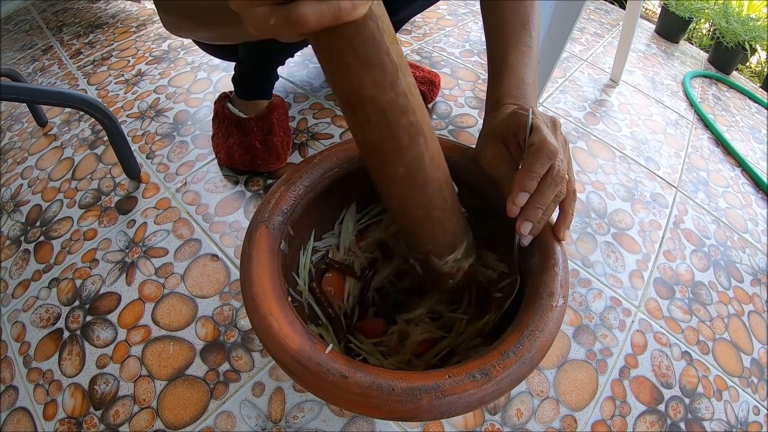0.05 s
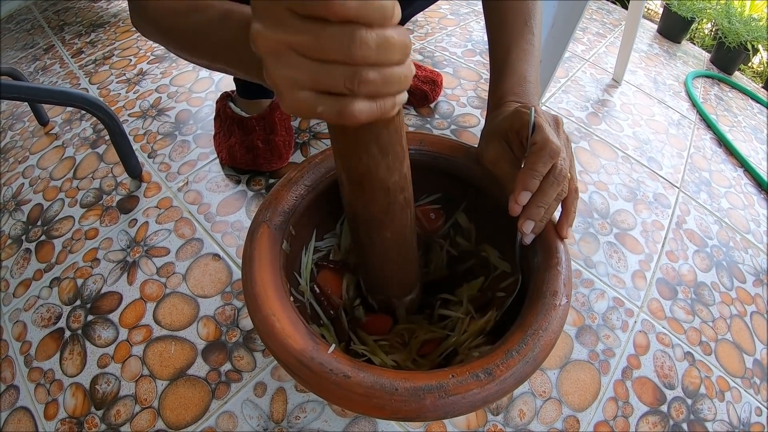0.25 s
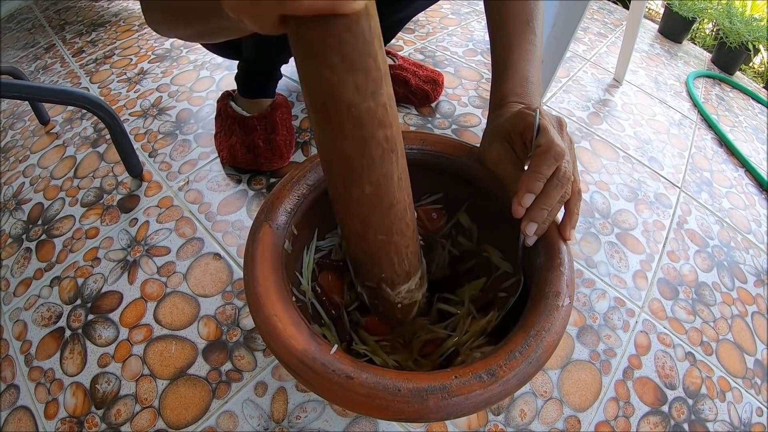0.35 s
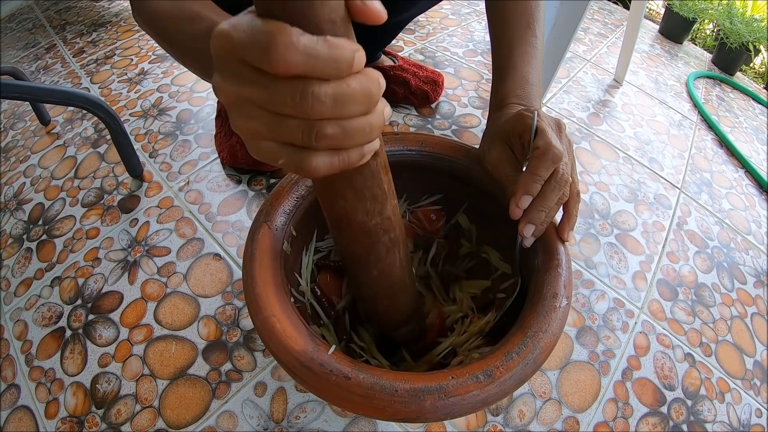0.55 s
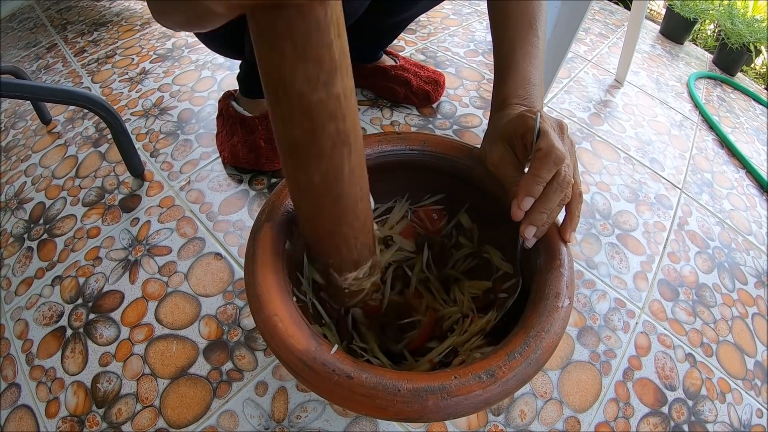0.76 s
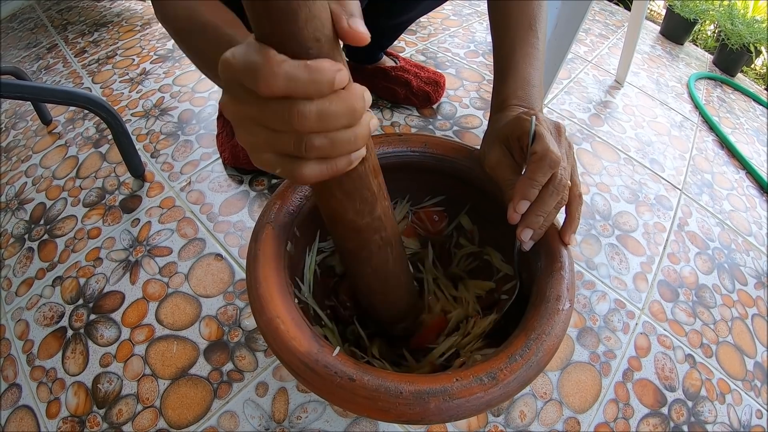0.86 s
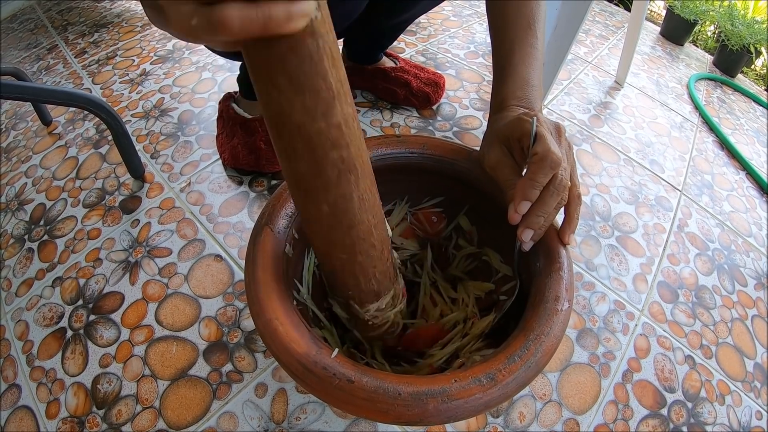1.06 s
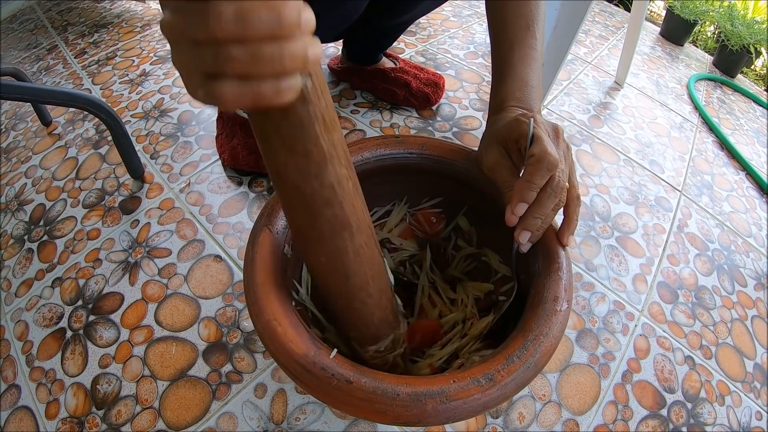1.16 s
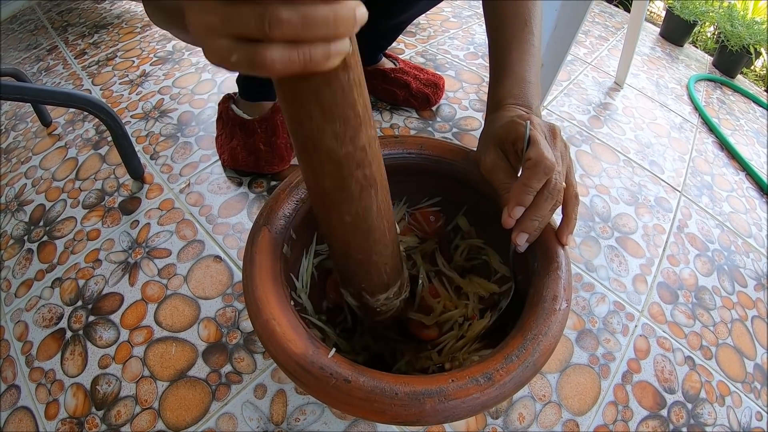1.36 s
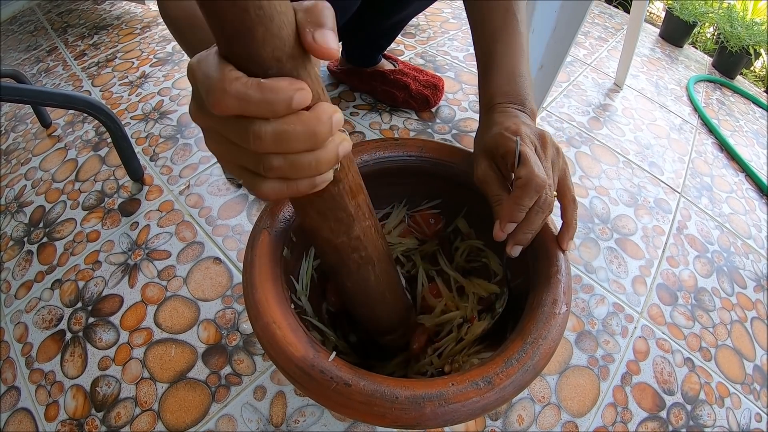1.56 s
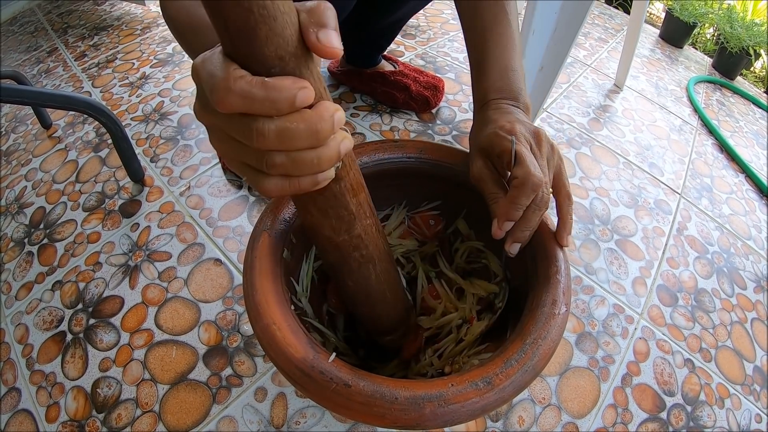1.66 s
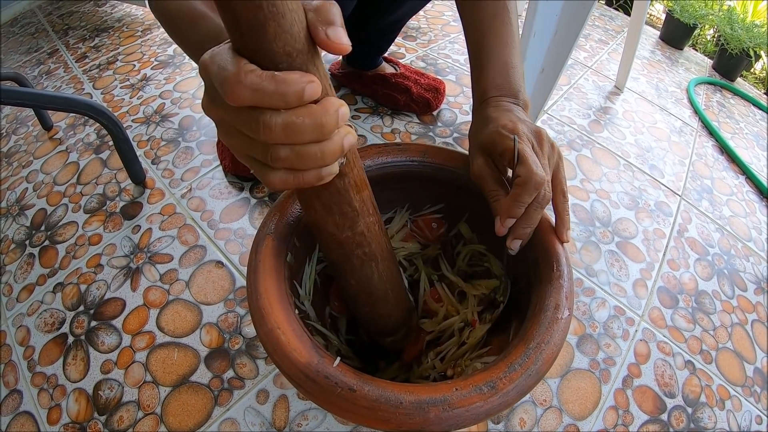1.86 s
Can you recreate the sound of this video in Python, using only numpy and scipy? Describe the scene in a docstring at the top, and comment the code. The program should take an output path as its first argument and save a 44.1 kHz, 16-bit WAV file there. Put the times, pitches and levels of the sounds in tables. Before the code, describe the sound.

Close by, five steady strokes of a wooden pestle crush wet stalks in a clay mortar, each with a crunch, a squelch and a faint suck. The pot knocks and rings dully, loudest on the first and third strokes.

```python
"""Five wet, crunchy strokes of a wooden pestle pounding herbs and tomato in a clay mortar, close up.
Each stroke crunches through the stalks, squeezes out a squelch of tiny bubbles and lets go with a faint
suck. The pot knocks dully on the tiled floor and rings, with one clack of wood on bare clay and a few
light clinks. A low rumble lies under it all."""
import sys
import numpy as np
from scipy import signal
from scipy.fft import rfft, irfft
from scipy.io import wavfile

SR = 44100
rng = np.random.default_rng(int(sys.argv[2]) if len(sys.argv) > 2 else 0)


def int16_out(signal):
    """Quantize to a 16-bit WAV file."""
    q = np.round(np.clip(np.atleast_2d(signal).T, -1, 1) * 32767)
    wavfile.write(sys.argv[1], SR, q.astype(np.int16))


N = 83790
TIME = np.arange(N) / SR
LN_1000 = np.log(1000)  # 60 dB of decay


def from_db(db):
    """Decibels to gain."""
    return 10 ** (np.asarray(db) / 20)


def rms_one(x):
    """Scale to unit power."""
    return x / np.sqrt(np.mean(x ** 2) + 1e-20)


def at_hz(points, hz):
    """Read an EQ curve on a log-frequency axis."""
    freqs, db = np.transpose(points)
    return np.interp(np.log(np.maximum(hz, 1)), np.log(freqs), db)


def add(out, start_s, sound):
    """Mix a sound in at a time."""
    i = max(int(start_s * SR), 0)
    out[i:i + len(sound)] += sound[:N - i]


def resonate(x, hz, width_hz):
    """A resonance with unity gain at its peak."""
    r = np.exp(-np.pi * width_hz / SR)
    feedback = [1, -2 * r * np.cos(2 * np.pi * hz / SR), r * r]
    return signal.lfilter(np.array([1, 0, -1]) * (1 - r * r) / 2, feedback, x + 1e-18)


def swell(start, end, rise_db_per_s, fall_db_per_s):
    """Gain that climbs until start, holds until end, then falls."""
    before, after = np.maximum(start - TIME, 0), np.maximum(TIME - end, 0)
    return from_db(-rise_db_per_s * before - fall_db_per_s * after)


def grains(envelope, colour, density, cycles, bands=36, spread_db=4.5):
    """A cloud of tiny uneven bursts, denser in the treble, each ringing briefly at its own pitch."""
    out = np.zeros(N)
    for hz in np.geomspace(430, 15500, bands):
        born = rng.random(N) < density / bands * np.sqrt(hz / 2000) / SR
        sizes = from_db(spread_db * np.minimum(rng.exponential(1, N), 3)) * rng.choice([-1, 1], N)
        bursts = rms_one(born * sizes) * envelope
        out += from_db(at_hz(colour, hz)) * resonate(bursts, hz, LN_1000 / np.pi * hz / cycles)
    return out * np.sqrt(np.sum(envelope ** 2) / np.sum(out ** 2))


def struck(modes, contact_s):
    """Decaying modes that build up during the contact."""
    ring = sum(from_db(db - 60 * TIME / t60) * np.sin(2 * np.pi * (hz * TIME + rng.random()))
               for hz, db, t60 in modes)
    return np.minimum(TIME / contact_s, 1) * ring


def pulp(crunch_attack_s=0.002, crunch_fade_db_per_s=86, hold_s=0.007, gurgle_width_hz=280):
    """Stalks crunch, juice squelches, an air pocket gurgles at the bottom and the pestle sucks free."""
    # pestle strokes: (contact [s], crunch [dB], deepest squeeze [s], squelch [dB], squelch fall [dB/s],
    # gurgle pitch [Hz], release [s], suck [dB])
    strokes = [(0.196, -37.5, 0.25, -22.5, 387, 1446, 0.34, -42.5),
               (0.554, -45, 0.5832, -27, 376, 1110, 0.65, -44.5),
               (0.879, -30.5, 0.95, -22.5, 676, 1680, 1.01, -42.5),
               (1.239, -35, 1.300, -24, 509, 1460, 1.385, -45.5),
               (1.583, -35, 1.605, -29, 490, 1480, 1.67, -47)]
    # tone colours of the three grain layers: (frequency [Hz], level [dB])
    crunch_colour = [(600, 2.5), (1300, -13), (2200, -21), (3000, 11.5), (4400, 7.5), (6000, -22),
                     (8500, 5), (11000, -14), (15500, -14)]
    squelch_colour = [(450, 0.5), (590, 1), (790, -23.5), (1140, 3), (1500, -2.5), (2400, -1.5), (4300, -7),
                      (5500, -16), (8200, -16.5), (11000, -20.5), (15500, -36)]
    suck_colour = [(600, -9), (1400, -2), (2200, -0.5), (3600, 1.5), (5500, -26), (9000, -14), (15500, -33)]
    crunch, squelch, gurgle, suck = np.zeros((4, N))
    for contact, crunch_db, deepest, squelch_db, fall, gurgle_hz, release, suck_db in strokes:
        age = np.maximum(TIME - contact, 0)
        bite = np.minimum(age / crunch_attack_s, 1) * from_db(crunch_db - crunch_fade_db_per_s * age)
        crunch += bite * swell(contact, deepest, 0, fall_db_per_s=483)
        pressed = np.clip(1 + (TIME - contact) / 0.015, 0, 1)  # opens just ahead of the contact
        squeeze = swell(deepest - hold_s / 2, deepest + hold_s / 2, 507, fall)
        squelch += from_db(squelch_db) * pressed * squeeze
        pocket = resonate(rng.standard_normal(N), gurgle_hz, gurgle_width_hz)
        pocket = rms_one(resonate(pocket, gurgle_hz, gurgle_width_hz))
        gurgle += from_db(squelch_db - 5) * pocket * swell(deepest, deepest, 1440, 597)
        suck += from_db(suck_db) * swell(release, release, 145, 466) * (TIME > deepest)
    return (gurgle + grains(crunch, crunch_colour, density=5000, cycles=11.6)
            + grains(squelch, squelch_colour, density=5500, cycles=11.6)
            + grains(suck, suck_colour, density=3000, cycles=23))


def pops(cycles=6.1, attack_s=0.00042, spray_db=-13, spray_s=0.0044):
    """Single stalks snap and bubbles burst: a few cycles of tone with a short spray around its pitch."""
    # snaps and bursts: (time [s], level [dB], pitch [Hz])
    bursts = [(.002, -39, 1400), (.008, -34, 2320), (.017, -35, 3520), (0.193, -15, 11500),
              (0.2561, -8.5, 1390), (0.2658, -6.5, 1510), (0.28, -11.5, 2550), (0.3555, -20, 2550),
              (.562, -12.5, 2200), (0.569, -12.5, 2720), (.579, -7.5, 1600), (.580, -20, 1130),
              (0.601, -9.5, 4810), (.642, -30, 2400), (0.655, -21, 1880), (.683, -29, 3900),
              (.814, -41, 3100), (.880, -15.5, 3360), (0.887, -12, 5540), (.922, -18, 5500),
              (.934, -7.5, 3000), (.941, -8, 1700), (1.241, -17.5, 4570), (1.2845, -8.5, 2420),
              (1.2979, -5.5, 1710), (1.365, -24.5, 3840), (1.388, -30, 3540), (1.404, -35, 11000),
              (1.5804, -20, 5260), (1.5895, -11.5, 4170), (1.623, -6.5, 1483), (1.632, -11, 3000),
              (1.648, -21, 5160)]
    out = np.zeros(N)
    attack = np.minimum(TIME / attack_s, 1)
    for start, db, hz in bursts:
        tone = np.sin(2 * np.pi * hz * TIME) * np.exp(-LN_1000 * TIME * hz / cycles)
        band = resonate(resonate(rng.standard_normal(N), hz, hz * 0.69), hz, hz * 1.32)
        spray = rms_one(band) * np.exp(-TIME / spray_s)
        add(out, start, from_db(db) * (tone + from_db(spray_db) * spray) * attack)
    return out


def bowl(wet):
    """The air in the bowl resonates and gives the wet sounds a hollow colour."""
    # air resonances: (frequency [Hz], width [Hz], gain [dB])
    air_modes = [(1115, 62, -5), (1422, 73, -2.5), (1532, 38, -2.5), (1960, 95, -2.5), (2424, 135, -6)]
    return wet + sum(from_db(db) * resonate(wet, hz, width) for hz, width, db in air_modes)


def knocks(ring_db=5.5):
    """Cushioned blows a few cycles long set the clay pot ringing, led by its lowest mode."""
    # dull knocks of pestle and pot: (time [s], level [dB], pitch [Hz], rise [s])
    blows = [(.004, -26, 479, 0.003), (0.046, -36, 430, 0.0033), (0.057, -41, 452, 0.0024),
             (0.1996, -8, 490, .0036), (0.2208, -5.5, 533, 0.0032), (.2251, -7.5, 359, 0.0031),
             (.2315, -22.5, 375, 0.0047), (.567, -35, 560, 0.0044), (.309, -27.5, 471, 0.0039),
             (.709, -38, 499, 0.0042), (.732, -43.5, 450, .003), (.812, -45, 396, .004),
             (.883, -39, 505, .005), (.913, -22.5, 486, 0.0062), (.944, -19, 620, 0.0035),
             (.9605, -17, 533, 0.0057), (0.9708, -11.5, 398, 0.0017), (.974, -25, 163, 0.0038),
             (1.0012, -12, 327, 0.0028), (1.0018, -13.5, 556, 0.0031), (1.056, -23, 394, 0.0017),
             (1.192, -37, 308, .004), (1.251, -32.5, 152.6, 0.0094), (1.253, -22.5, 352, 0.0022),
             (1.269, -29.5, 393, 0.0031), (1.301, -26, 608, 0.0073), (1.491, -36.5, 374, 0.0032),
             (1.622, -26.5, 570, 0.0034), (1.634, -30.5, 480, .0045), (1.677, -41.5, 388, 0.0048),
             (1.717, -31.5, 495, 0.0027), (1.753, -35, 410, 0.0033)]
    # modes of the pot: (frequency [Hz], relative gain [dB], t60 [s])
    pot_modes = [(297, 2, .39), (357, -5, .13), (409, -12, .22), (445, -18, .3), (535, -16, .22),
                 (610, -16, .18), (657, -14, .2), (740, -24, .5)]
    thuds = np.zeros(N)
    for start, db, hz, rise_s in blows:
        age = TIME / rise_s
        envelope = (age * np.exp(1 - age)) ** 2.47
        add(thuds, start, from_db(db) * envelope * np.sin(2 * np.pi * hz * TIME))
    ring = sum(from_db(db) * resonate(thuds, hz, LN_1000 / np.pi / t60) for hz, db, t60 in pot_modes)
    return thuds + from_db(ring_db) * ring


def clack(scuff_db=-3, scuff_s=0.0042):
    """The pestle hits bare clay: a bright, short ring with a scuff of noise."""
    # wood meets the wall: (time [s], level [dB])
    hits = [(0.1987, -21.5)]
    # modes of the clay wall: (frequency [Hz], level [dB], t60 [s])
    wall_modes = [(1065, -1, 0.056), (2374, 0, 0.028), (2755, -0.5, .062), (3460, -5.5, .036),
                  (4370, -4.5, 0.032), (6040, -5.5, 0.036), (7440, -4.5, 0.032), (10640, -3.5, 0.024),
                  (11300, -6, .02), (13160, -20, .012)]
    out = np.zeros(N)
    for start, db in hits:
        scuff = rms_one(resonate(rng.standard_normal(N), 4700, 6100)) * np.exp(-TIME / scuff_s)
        add(out, start, from_db(db) * (struck(wall_modes, contact_s=0.0011) + from_db(scuff_db) * scuff))
    return out


def clinks(scratch_db=-10.5, scratch_s=0.013):
    """Something small clinks: high modes with a light scratch."""
    # light taps: (time [s], level [dB], contact [s])
    taps = [(.044, -47, .003), (1.0238, -28.5, 0.0037), (1.054, -33, 0.0011), (1.063, -47, .002)]
    # their ring: (frequency [Hz], level [dB], t60 [s])
    modes = [(3320, -6, .025), (4590, 0.5, .052), (4860, -12, 0.024), (5120, -6, .045), (7101, -10, 0.034),
             (8400, -19, 0.045), (10000, -20, 0.025)]
    out = np.zeros(N)
    for start, db, contact_s in taps:
        envelope = np.minimum(TIME / contact_s, 1) * np.exp(-TIME / scratch_s)
        scratch = rms_one(resonate(rng.standard_normal(N), 4700, 4100)) * envelope
        add(out, start, from_db(db) * (struck(modes, contact_s) + from_db(scratch_db) * scratch))
    return out


def room(x, t60_s=0.29, level_db=-20, damping_hz=4270, predelay_s=0.008):
    """A faint, dull tail from tiles and walls."""
    tail = signal.sosfilt(signal.butter(1, damping_hz, fs=SR, output="sos"), rng.standard_normal(N))
    tail *= np.exp(-LN_1000 * TIME / t60_s) * (TIME > predelay_s)
    return from_db(level_db) * signal.fftconvolve(x, tail / np.sqrt(np.sum(tail ** 2)))[:N]


def rumble(air_db=-38.5, hum_db=-35, hum_hz=39, waver_db=1.5, waver_hz=2.53, wavers_per_s=6.1):
    """Quiet, bass-heavy air and a low hum that wavers in level and pitch."""
    # room tone: (frequency [Hz], relative level [dB])
    air_colour = [(15, 9), (28, 5), (45, 4.5), (62, -1.5), (96, 0.5), (155, -3), (200, -9.5), (380, -19),
                  (650, -25.5), (1000, -27.5), (2300, -31), (4500, -32), (9000, -38.5), (12500, -41),
                  (16000, -41)]
    hz = np.arange(N // 2 + 1) * SR / N
    air = irfft(rfft(rng.standard_normal(N)) * from_db(at_hz(air_colour, hz)) * (hz > 10), N)
    slow = np.exp(-(hz / wavers_per_s) ** 2)
    level, pitch = (rms_one(irfft(rfft(rng.standard_normal(N)) * slow, N)) for _ in range(2))
    hum = from_db(waver_db * level) * np.sin(2 * np.pi * np.cumsum(hum_hz + waver_hz * pitch) / SR)
    return from_db(air_db) * rms_one(air) + from_db(hum_db) * rms_one(hum)


def scene(hiss_db=-71.5):
    """The mortar sits dead centre; only faint hiss differs between the ears."""
    wet = bowl(pulp() + pops())
    mortar = from_db(-0.5) * wet + knocks() + clack() + clinks()
    return mortar + room(mortar) + rumble() + from_db(hiss_db) * rng.standard_normal((2, N))


def record(dry):
    """The highest treble is softened; the top is cut steeply."""
    soften_hz, cutoff_hz = 14200, 15700
    soft = signal.sosfilt(signal.butter(3, soften_hz, fs=SR, output="sos"), dry)
    return signal.sosfilt(signal.ellip(10, .1, 90, cutoff_hz, fs=SR, output="sos"), soft)


dry = scene()
out = record(dry)
int16_out(out)
```